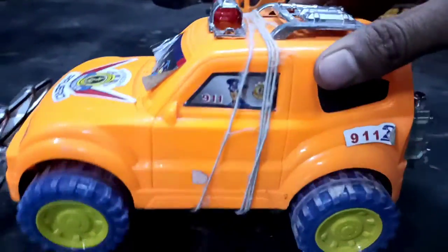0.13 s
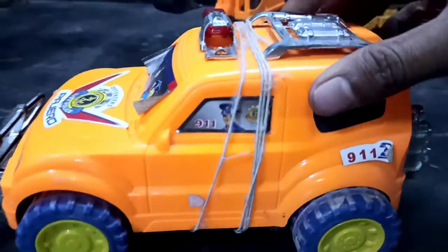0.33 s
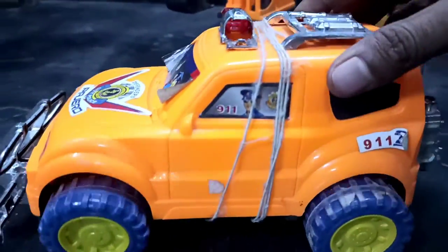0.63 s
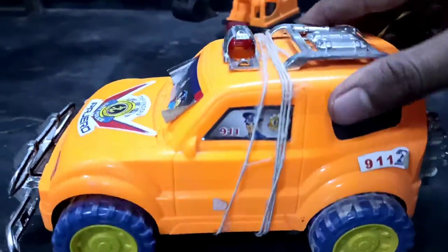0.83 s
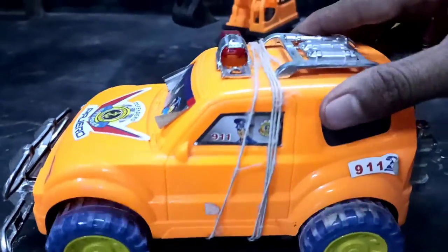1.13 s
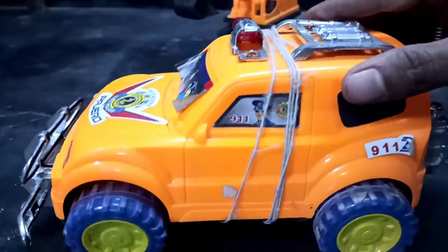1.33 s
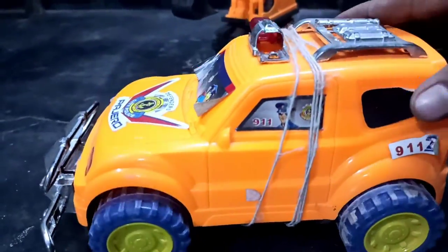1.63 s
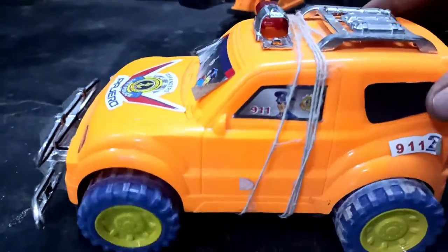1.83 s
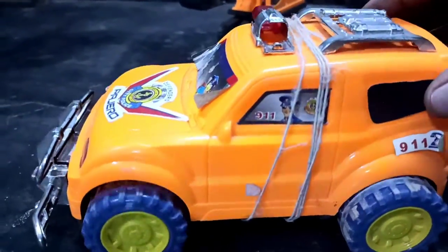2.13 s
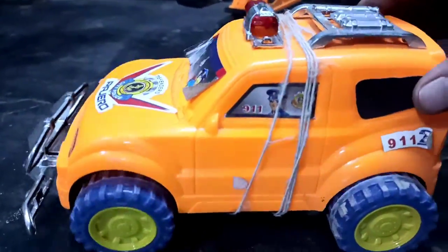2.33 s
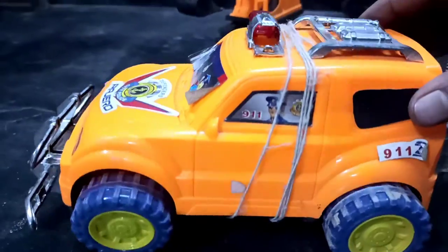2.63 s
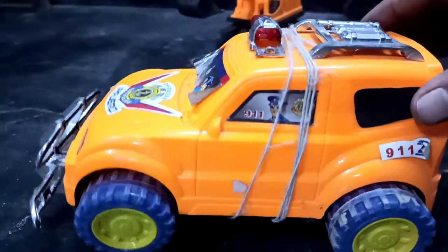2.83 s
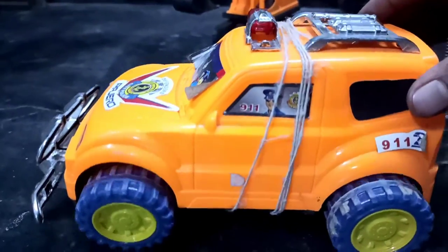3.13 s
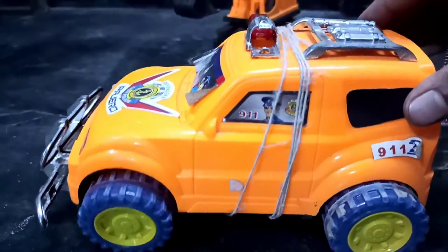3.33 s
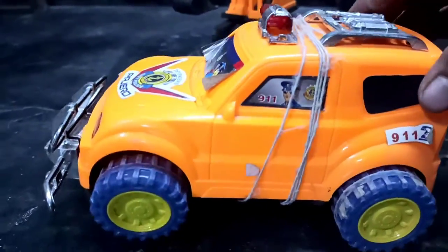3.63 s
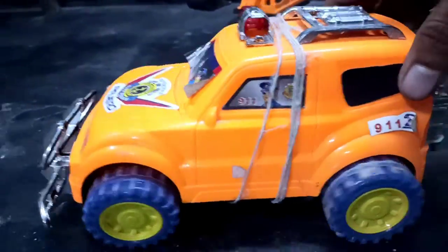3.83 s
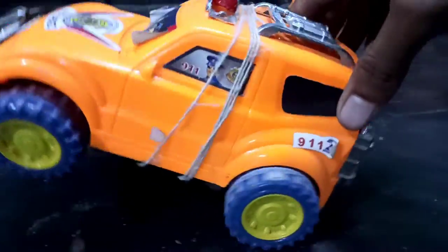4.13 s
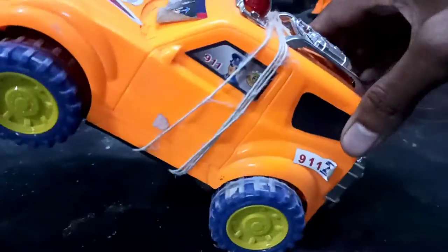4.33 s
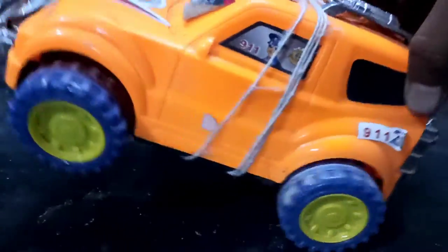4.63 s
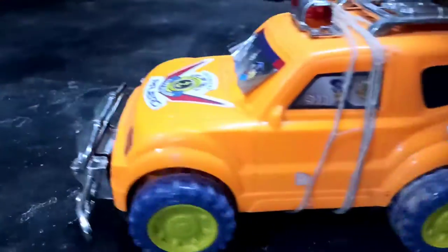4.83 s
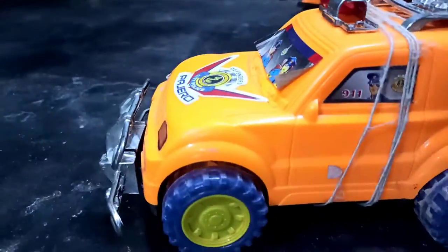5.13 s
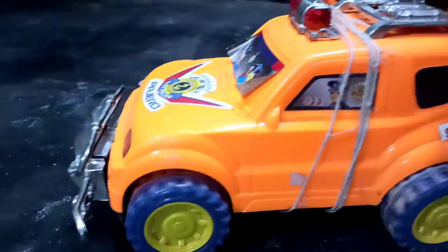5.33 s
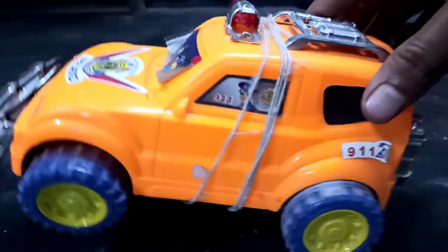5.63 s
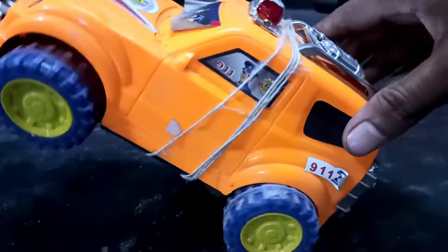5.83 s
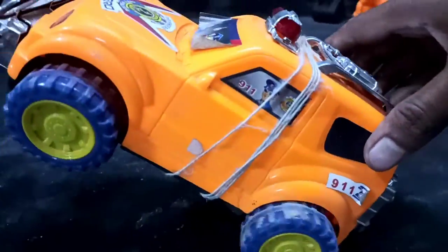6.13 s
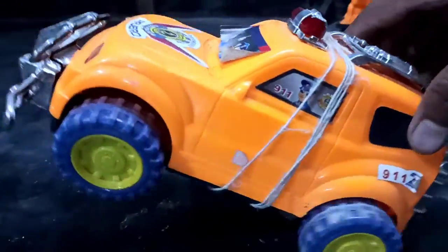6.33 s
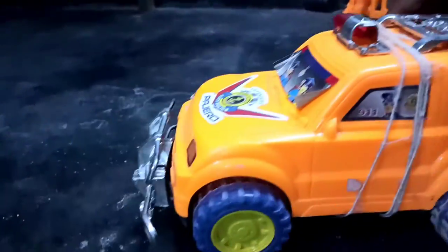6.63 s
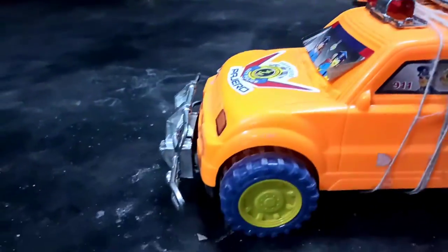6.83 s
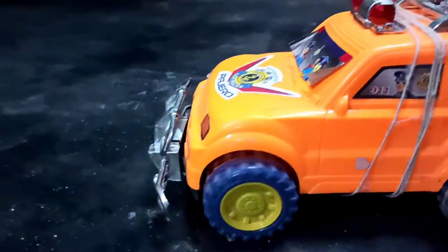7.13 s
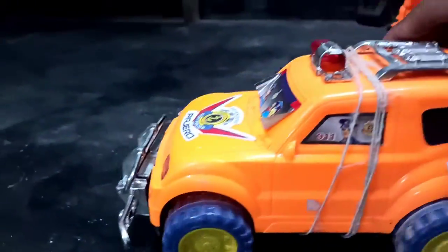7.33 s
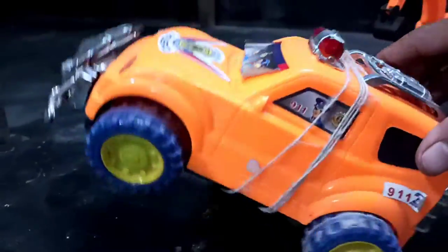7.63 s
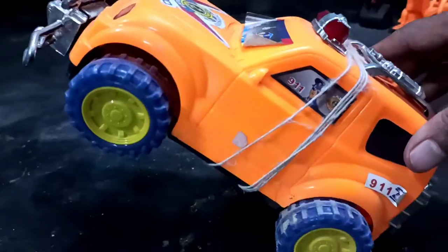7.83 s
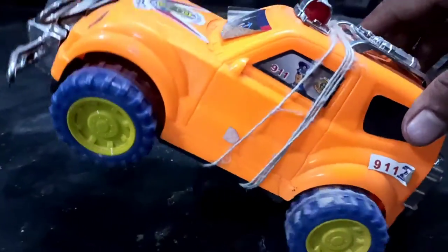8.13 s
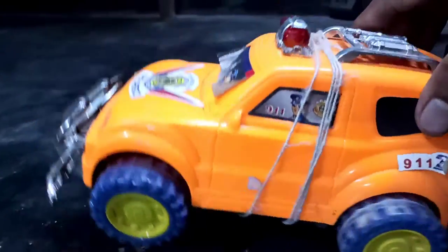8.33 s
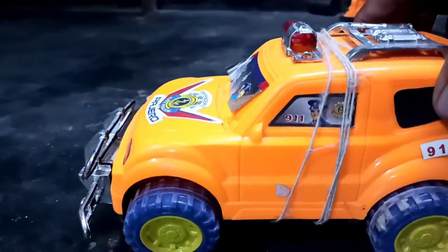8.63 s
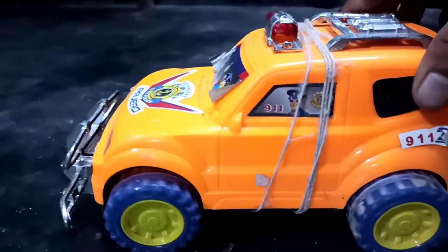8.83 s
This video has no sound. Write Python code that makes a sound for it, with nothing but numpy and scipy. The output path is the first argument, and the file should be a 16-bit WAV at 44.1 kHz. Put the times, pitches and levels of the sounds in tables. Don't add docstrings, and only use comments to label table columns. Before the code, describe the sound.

Knobbly toy wheels chatter and rumble over a hard floor, with scraping grit, bright axle ticks and the lifted front clacking down three times.

```python
import sys
import numpy as np
from scipy import signal
from scipy.fft import rfft, irfft, next_fast_len
from scipy.io import wavfile
from scipy.ndimage import uniform_filter1d

SR = 44100
rng = np.random.default_rng(int(sys.argv[2]) if len(sys.argv) > 2 else 0)


def ratio(d):
    e = np.asarray(d, float) / 20
    return 10 ** e


def wav_out(sig):
    wavfile.write(sys.argv[1], SR, np.round(np.clip(np.atleast_2d(sig).T, -1, 1) * 32767).astype(np.int16))


N = 396459

# start in seconds, peak level in dB, time for the chatter to fade by 60 dB in seconds.
JIGGLES = [(0.085, -24, .059), (0.102, -13.5, .13), (0.16, -13.5, 0.027), (0.189, -20, 0.025),
           (0.203, -15.5, 0.072), (0.276, -15, 0.14), (0.325, -18, 0.043), (0.345, -16.5, 0.07),
           (0.454, -22.5, 0.078), (0.599, -26, .048), (0.625, -28, 0.097), (0.68, -25.5, 0.034),
           (0.694, -26, 0.078), (0.761, -20, 0.043), (0.882, -14.5, 0.081), (0.905, -18, .03),
           (0.923, -14, 0.076), (1.011, -29, .11), (1.055, -26, 0.035), (1.124, -23.5, 0.23),
           (1.231, -25.5, .05), (1.258, -20.5, 0.065), (1.342, -28, 0.073), (1.356, -22, 0.1),
           (1.387, -17.5, 0.053), (1.514, -30, 0.022), (1.618, -22.5, 0.073), (1.637, -15.5, 0.04),
           (1.709, -29, 0.022), (1.818, -27.5, 0.085)]
# start in seconds, peak level in
# dB, time for the chatter to fade by 60 dB in seconds.
LATER_JIGGLES = [(1.872, -16, 0.033), (1.904, -18, 0.23), (1.984, -18.5, 0.17), (2.081, -14.5, 0.053),
                 (2.134, -22, 0.035), (2.188, -21.5, 0.036), (2.27, -23, 0.18), (2.305, -15, 0.082),
                 (2.377, -12, 0.088), (2.442, -20, .059), (2.505, -14.5, 0.076), (2.598, -22, 0.11),
                 (2.746, -28.5, .04), (2.759, -17, 0.075), (2.838, -21.5, 0.25), (2.895, -20.5, 0.12),
                 (2.955, -23.5, 0.062), (3.001, -13.5, .02), (3.066, -23, 0.056), (3.111, -18, 0.12),
                 (3.204, -21.5, 0.13), (3.243, -23, 0.08), (3.277, -15, 0.093), (3.358, -23, 0.11),
                 (3.376, -21, 0.036), (3.427, -19.5, 0.028), (3.444, -12, 0.042), (3.531, -18, 0.034),
                 (3.576, -28.5, .047), (3.777, -26.5, 0.049)]
# start in seconds, thud level in dB, clatter level in dB, clatter 60 dB fade in seconds.
DROPS = [
    (4.8466, -17.5, -4.5, .03),
    (6.6149, -11, -8, 0.11),
    (8.4844, -11, -13, 0.075),
]
# time in seconds, extra scrape in dB.
SKID = [(0.0, 1.5), (0.4, 7), (0.65, -5), (1.4, 6), (1.7, -7.5), (1.9, 4), (3.75, -5), (3.9, -1.5),
        (4.4, 8.5), (4.75, 0), (5.08, 2), (5.3, -5.5), (5.9, -0.5), (6.15, 9), (6.4, 0), (7.1, -3.5),
        (8.05, 0.5), (8.99, -5.5)]
# frequency in Hz, likeness from 0 (unrelated) to 1 (the same).
LIKENESS = [(60, 0.76), (290, 0.88), (700, 0.89), (1400, 0.12), (3000, 0.27), (7000, 0.13), (15000, 0.88)]
REFERENCE_DB = -24
DEAD_BAND_HZ = [8800, 11450]


def rms_one(x):
    return x / np.sqrt(np.mean(x ** 2) + 1e-20)


def in_time(rows):
    s, *columns = np.transpose(rows)
    return [np.interp(np.arange(N) / SR, s, c) for c in columns]


def at_hz(points, hz):
    table_hz, values = np.array(points)[:, 0], np.array(points)[:, 1]
    return np.interp(np.log(hz), np.log(table_hz), values)


def likeness(hz, less=0.0):
    return np.clip(at_hz(LIKENESS, hz) - less, 0, 1)


def drift(rate):
    r = np.exp(-64 * np.pi * rate / SR)
    noise = rng.standard_normal(N // 32 + 1002)
    slow = signal.lfilter([1], [1, -2 * r, r * r], noise)[1000:]
    return np.interp(np.arange(N) / 32, np.arange(len(slow)), rms_one(slow))


def contacts(per_s, spread_db):
    born = rng.random(N) < per_s / SR
    sizes = ratio(spread_db * np.minimum(rng.exponential(1, N), 4))
    return rms_one(born * sizes * rng.standard_normal((2, N)))


def bursts(times, peak_db, t60):
    power = np.zeros(N)
    for s, db, fade in zip(times, peak_db, np.clip(t60, .008, .4)):
        first = round(s * SR)
        t = np.arange(min(int(fade * SR), N - first)) / SR
        power[first:][:len(t)] += ratio(db - 60 * t / fade) ** 2
    return np.sqrt(power)


def single_blows(times, peak_db, side_share):
    hits = np.zeros((2, N))
    hits[:, np.round(times * SR).astype(int)] = ratio(peak_db) * [[1], [side_share]]
    return hits


def resonate(force, modes, wander_db):
    out, power = 0, 0
    for k, (hz, width, db) in enumerate(modes):
        r = np.exp(-np.pi * width / SR)
        b = (1 - r * r) / 2 * np.array([1, 0, -1])
        a = [1, -2 * r * np.cos(2 * np.pi * hz / SR), r * r]
        drive = force * ratio(db + wander_db * drift(5.75)) + 1e-18
        mid, side = signal.lfilter(b, a, drive) * (-1) ** k
        alike = likeness(hz)
        out = out + np.sqrt((1 + alike) / 2) * mid + np.sqrt((1 - alike) / 2) * side * [[1], [-1]]
        power += ratio(db) ** 2 * (1 - r * r) / 2
    return out / np.sqrt(power)


def drumming():
    # time in seconds, drumming level in dB.
    rocking = [(0.0, -26), (0.32, -28.5), (0.46, -41.5), (0.7, -71.5), (0.97, -37), (1.08, -44.5),
               (1.22, -32.5), (1.32, -46), (1.7, -40.5), (2.0, -31), (2.15, -46.5), (2.47, -37),
               (2.7, -47.5), (2.95, -35.5), (3.08, -38.5), (3.44, -43), (3.63, -45), (3.82, -52.5)]
    # time in seconds, drumming level in dB.
    pushes = [
        [(3.85, -22.5), (3.88, -29), (3.906, -24.5), (4.338, -25), (4.352, -20.5), (4.494, -46)],
        [(5.25, -60), (5.31, -36), (5.35, -27.5), (5.494, -20.5), (5.748, -23.5), (5.822, -18), (5.98, -32.5),
         (6.05, -53.5)],
        [(7.02, -53), (7.11, -35.5), (7.254, -23), (7.374, -30.5), (7.402, -27), (7.808, -24.5), (7.98, -52.5)],
        [(8.81, -41.5), (8.972, -28.5), (8.99, -39.5)],
    ]
    # start in seconds, start level in dB, nose drop in seconds, level at the drop in dB,
    # start of braking in seconds.
    pulls = [
        (4.52, -38.5, 4.847, -21, 5.011),
        (6.1, -45, 6.614, -23, 6.69),
        (8.03, -45, 8.485, -25.5, 8.57),
    ]
    gather_share = 0.6
    landing_s, stop_s, settle_s = 0.058, .11, 0.092
    rows = rocking + sum(pushes, [])
    for start, start_db, drop, db, brake in pulls:
        rows = rows + [(start, start_db),
                       (start + gather_share * (drop - start), db - 5),
                       (drop, db),
                       (drop + landing_s, db + 4.5),
                       (brake, db - 5),
                       (brake + stop_s, -48.5),
                       (brake + stop_s + settle_s, -58.5)]
    return in_time(sorted(rows))[0]


def jolt_rows():
    # start in seconds, peak level in dB, time for the chatter to fade by 60 dB in seconds.
    bumps = [(3.835, -11, 0.055), (4.009, -15.5, 0.091), (4.121, -11, .05), (4.152, -15, 0.1),
             (4.279, -18, 0.13), (4.345, -8.5, 0.11), (4.774, -14, .064), (4.829, -25, 0.085),
             (4.901, -21.5, .12), (4.969, -19, 0.15), (5.09, -30.5, 0.027), (5.275, -32.5, 0.026),
             (5.482, -9, 0.02), (5.638, -17, .07), (5.76, -18, 0.22), (6.385, -25, 0.15),
             (6.459, -22.5, 0.16), (6.549, -16.5, 0.062), (6.995, -32, .024), (7.14, -19, 0.048),
             (7.201, -28.5, 0.13), (7.379, -21, 0.073), (7.422, -13, 0.015), (7.495, -18.5, .15),
             (7.761, -12, 0.033), (7.796, -14, 0.1), (8.258, -19.5, .028), (8.412, -17.5, 0.1),
             (8.791, -20, 0.029)]
    rocked = [(*row, -9) for row in JIGGLES + LATER_JIGGLES]
    rolled = [(*row, -12) for row in bumps]
    thuds = [(s, thud_db, 0.2, -9) for s, thud_db, _, _ in DROPS]
    rows = np.array(rocked + rolled + thuds)
    buzz_spread_db = 2
    return rows + buzz_spread_db * rng.standard_normal((len(rows), 1)) * [0, 0, 0, 1]


def shell():
    # frequency in Hz, width in Hz, level in dB.
    shell_modes = [(116, 300, -31.5), (266.3, 92, -22), (423.4, 167, -8), (491, 29, 0), (563.4, 76, -0.5),
                   (646.3, 72, 1), (719, 48.4, 2.5), (833.5, 103, -4), (950, 109, -6), (1270, 243, -3.5),
                   (1440, 480, -18.5), (1970, 530, -29.5), (2420, 360, -33.5)]
    # frequency in Hz, width in Hz, level in dB.
    knock_modes = [(647, 82, -9.5), (1260, 350, -23)]
    cavity_db = drumming()
    skid_db = in_time(SKID)[0]
    panel_db = -36.5 + 1.05 * (cavity_db - REFERENCE_DB) + 0.27 * skid_db
    tread = ratio(1.2 * drift(21) + 2.2 * drift(90)) * contacts(per_s=4000, spread_db=2.0)

    s, peak_db, t60, buzz_db = np.transpose(jolt_rows())
    s = s - .0015
    chatter = contacts(per_s=3000, spread_db=1.5)
    jolts = bursts(s, peak_db - 0.5, t60) * chatter
    buzzes = bursts(s, peak_db + buzz_db - 6.0, t60 * 2.19) * chatter
    tyre = signal.butter(2, 1500, fs=SR, output="sos")
    blows = signal.sosfilt(tyre, single_blows(s, peak_db + 18.5, side_share=.25))

    rumble = resonate(ratio(cavity_db - 18.5) * tread + ratio(-17.0) * jolts, shell_modes[:2], wander_db=2.0)
    cavity = resonate(ratio(cavity_db) * tread + jolts, shell_modes[2:9], wander_db=1.36)
    cavity = cavity + resonate(blows, knock_modes, wander_db=0.0)
    panels = resonate(ratio(panel_db) * tread + buzzes, shell_modes[9:], wander_db=2.0)
    deep = signal.butter(2, [60, 400], "band", fs=SR, output="sos")
    soft = signal.butter(2, [280, 1500], "band", fs=SR, output="sos")
    stiff = signal.butter(2, [800, 3500], "band", fs=SR, output="sos")
    return signal.sosfilt(deep, rumble) + signal.sosfilt(soft, cavity) + signal.sosfilt(stiff, panels)


def tick_rows():
    # start in seconds, peak level in dB, time for the rattle to fade by 60 dB in seconds.
    loose_ticks = [(0.0979, -17, 0.1), (0.155, -23.5, 0.16), (0.274, -18, 0.042), (0.31, -29, 0.13),
                   (0.609, -39, 0.021), (0.7626, -41, 0.054), (0.8782, -25, 0.025), (0.8998, -32, 0.3),
                   (1.143, -28, 0.084), (1.358, -35, 0.12), (1.6384, -39.5, 0.24), (1.8679, -21.5, 0.11),
                   (1.9816, -21.5, 0.075), (2.0723, -25.5, 0.052), (2.2725, -31, 0.054),
                   (2.3729, -22, 0.087), (2.4405, -29, 0.088), (2.4977, -31, 0.059), (2.597, -38, 0.12),
                   (2.7592, -27, 0.083), (2.8668, -29, 0.22), (2.9938, -25.5, 0.038), (3.245, -35.5, 0.12),
                   (3.271, -30.5, 0.2), (3.4365, -33, 0.14)]
    # start in seconds, peak level in dB, time for the rattle to fade by 60 dB in seconds.
    clacks = [(0.414, -24, .12), (1.001, -23, .028), (5.088, -38, .04), (3.831, -16.5, 0.11),
              (4.0113, -22, 0.037), (4.2788, -16.5, 0.2), (4.385, -24, 0.11), (4.5133, -31, .12),
              (5.479, -34, 0.1), (7.2196, -32, 0.28), (7.3884, -28.5, 0.052), (7.7613, -22.5, 0.038),
              (7.7977, -27.5, .068), (8.2586, -36, 0.051), (8.7907, -35, 0.038)]
    loose = [(*row, 5.5) for row in loose_ticks]
    axles = [(*row, -1) for row in clacks]
    clatters = [(s, db, t60, 3) for s, _, db, t60 in DROPS]
    aftershakes = [(s, -30, .4, 3) for s, *_ in DROPS]
    shaken = [(s, db - 18, 0.067, 5.5) for s, db, _ in JIGGLES + LATER_JIGGLES]
    return loose + axles + clatters + aftershakes + shaken


def trim():
    # frequency in Hz, width in Hz, level in dB.
    trim_modes = [(1253, 138, -0.5), (2020, 275, 1.5), (2484, 185, -0.5), (3140, 450, -3), (4163, 327, -2),
                  (4550, 210, -1), (5560, 200, -35), (6440, 337, -2.5), (6940, 174, -0.5), (7440, 190, 2),
                  (8480, 1050, -6), (12600, 8100, -3.5)]
    scrape_db = -47 + 0.8 * (drumming() - REFERENCE_DB) + in_time(SKID)[0]
    scrape = ratio(scrape_db + 2.0 * drift(17)) * contacts(per_s=4000, spread_db=0.5)

    s, peak_db, t60, tilt_db = np.transpose(tick_rows())
    grains = contacts(per_s=9000, spread_db=0.0)
    tilt_db = tilt_db + 2.5 * rng.standard_normal(len(s))
    cracks = single_blows(s, peak_db + 8.5, side_share=.5)
    ticks = bursts(s, peak_db - 9.5, t60) * grains + cracks
    low_ticks = bursts(s, peak_db - 12.5 + tilt_db, t60) * grains + cracks

    low = resonate(ratio(3.5) * (scrape + low_ticks), trim_modes[:7], wander_db=2.8)
    top = resonate(ratio(2.0) * (scrape + ticks), trim_modes[7:11], wander_db=2.5)
    fizz = resonate(ratio(-6.0) * (scrape + ratio(-2.5) * ticks), trim_modes[11:], wander_db=2.0)
    thin = signal.butter(2, 900, "high", fs=SR, output="sos")
    left, right = signal.sosfilt(thin, low + top + fizz)
    port_lag_s = 0.00018
    return np.array([left, np.interp(np.arange(N) - port_lag_s * SR, np.arange(N), right)])


def cavity_hum():
    noise = rng.standard_normal((2, N))
    return ratio(-54) * resonate(noise, [(610, 60, 0)], wander_db=2.0)


def room(x):
    t60_s, wall_cut_hz = .2, 8000
    size = next_fast_len(N + SR)
    circle = np.exp(-2j * np.pi * np.arange(size) / size)
    turn = circle[:size // 2 + 1]
    bins = np.arange(len(turn))
    dull = np.exp(-2 * np.pi * wall_cut_hz / SR)
    wall = (1 - dull) / (1 - dull * turn)
    echoes = np.zeros((2, len(turn)), complex)
    lags = (rng.uniform(0.0087, .04, 20) * SR).astype(int)
    for k, lag in enumerate(lags):
        loop = ratio(-60 * lag / SR / t60_s) * wall * circle[lag * bins % size]
        echoes[k % 2] += loop / (1 - loop) * (-1) ** (k // 2)
    alike = likeness(np.maximum(bins * SR / size, 1))
    echoes = np.sqrt(1 + alike) * echoes[0] + np.sqrt(1 - alike) * echoes[1] * [[1], [-1]]
    return irfft(rfft(x.mean(axis=0), size) * echoes, size)[:, :N]


def room_tone():
    # frequency in Hz, level in dB per Hz.
    air_colour = [(15, -33.5), (25, -20), (111, 1), (309, -2), (591, -1.5), (1100, -26), (2480, -26.5),
                  (11600, -21), (16000, -43)]
    hz = np.maximum(np.arange(N // 2 + 1) * SR / N, 1)
    mid, side = rfft(rng.standard_normal((2, N))) * ratio(at_hz(air_colour, hz))
    alike = likeness(hz, less=.2)
    both = np.sqrt(1 + alike) * mid + np.sqrt(1 - alike) * side * [[1], [-1]]
    return ratio(-53.5) * rms_one(irfft(both, N))


def scene():
    car = shell() + trim()
    echoes = ratio(-20) * room(car)
    balance_db = [[-.3], [.3]]
    return car * ratio(balance_db) + echoes + room_tone() + cavity_hum()


def thin_treble(x, margin_db, waver_db):
    hz, _, cells = signal.stft(x, SR, nperseg=1024)
    power = np.mean(np.abs(cells) ** 2, axis=0) + 1e-20
    patch_db = 10 * np.log10(uniform_filter1d(power, size=7, axis=0))
    in_treble = (hz > 2500) & (hz < DEAD_BAND_HZ[0])
    treble_db = 10 * np.log10(power[in_treble].mean(axis=0))
    chance = rng.standard_normal((65, len(treble_db) // 2 + 1))
    chance = np.repeat(np.repeat(chance, 8, axis=0), 2, axis=1)
    bar_db = treble_db - margin_db + waver_db * chance[:len(hz), :len(treble_db)]
    kept = (patch_db > bar_db) | (hz[:, None] < DEAD_BAND_HZ[0] - 300)
    return signal.istft(cells * kept, SR, nperseg=1024)[1][:, :N]


def roll_off(x):
    return signal.sosfilt(signal.butter(12, 16470, fs=SR, output="sos"), x)


def record(dry):
    gate_db, gate_slope = -46, .45
    level_db = 10 * np.log10(uniform_filter1d(np.mean(dry ** 2, axis=0), size=600) + 1e-12)
    gated = dry * ratio(-gate_slope * np.maximum(gate_db - level_db, 0))
    rounded = .85 * np.tanh(gated / .85)
    notch = signal.cheby2(6, 40, DEAD_BAND_HZ, "bandstop", fs=SR, output="sos")
    heard = signal.sosfilt(notch, rounded) + ratio(-17.5) * rounded
    thinned = thin_treble(heard, margin_db=18.5, waver_db=5.5)
    top_cut = signal.cheby2(20, 32, 15750, fs=SR, output="sos")
    return roll_off(signal.sosfilt(top_cut, thinned))


dry = scene()
out = record(dry)
wav_out(out)
```